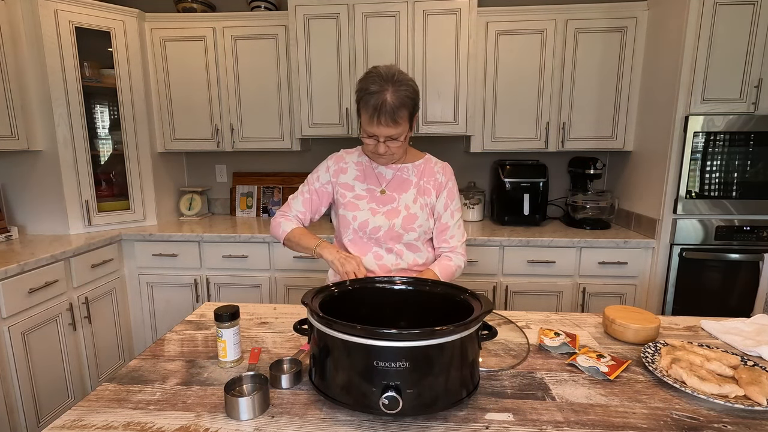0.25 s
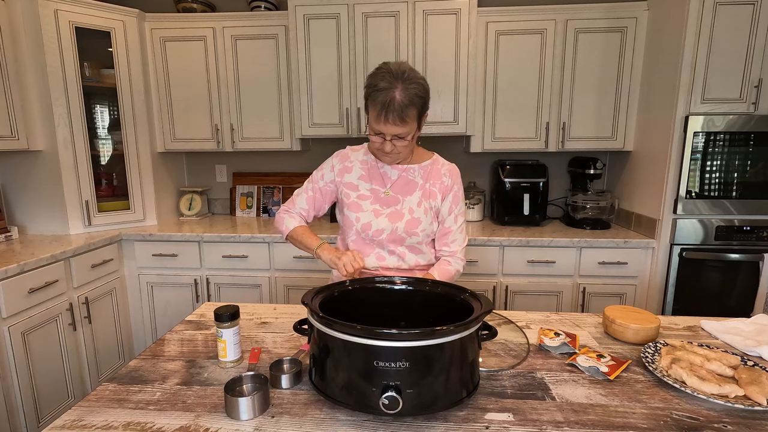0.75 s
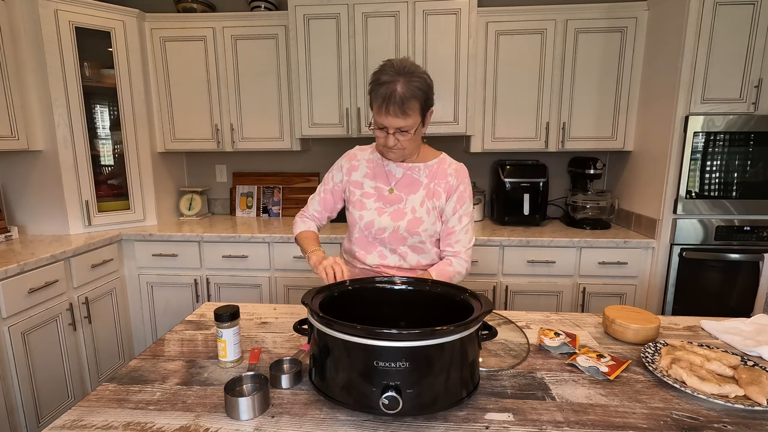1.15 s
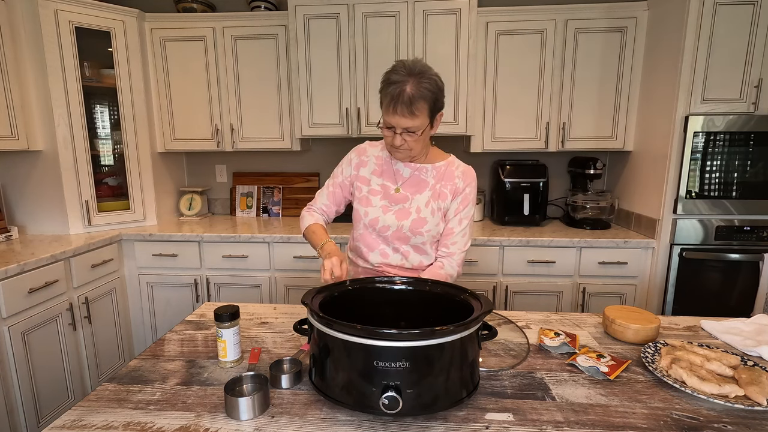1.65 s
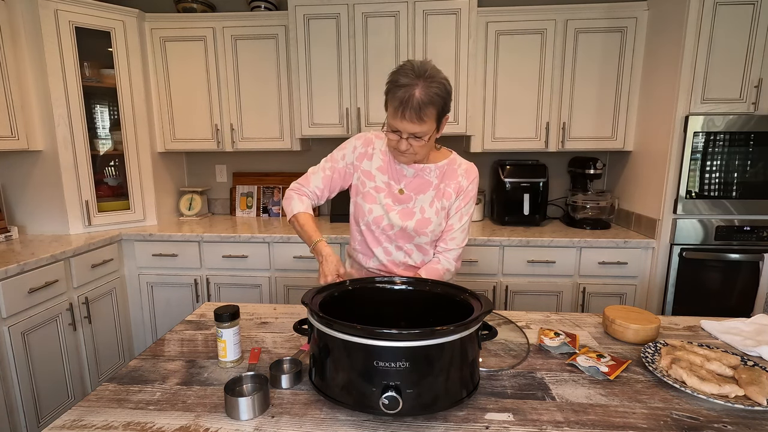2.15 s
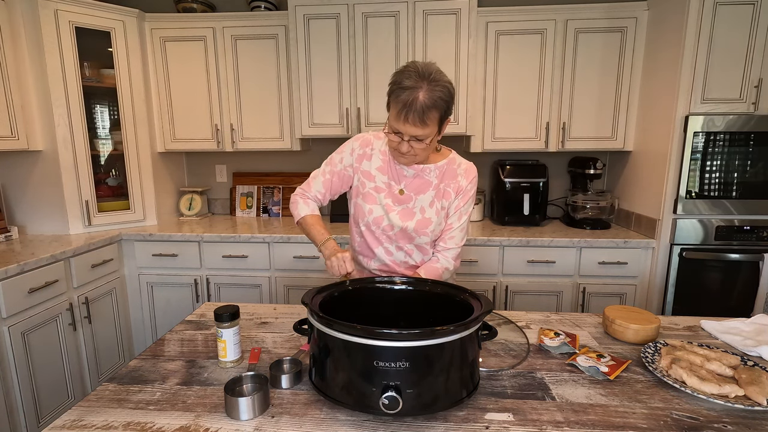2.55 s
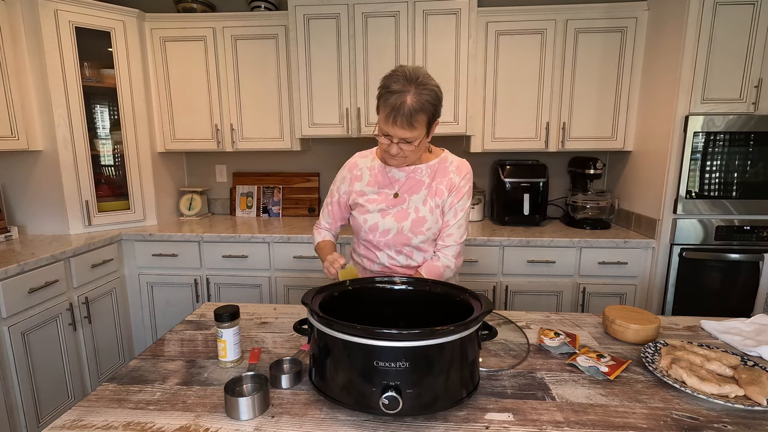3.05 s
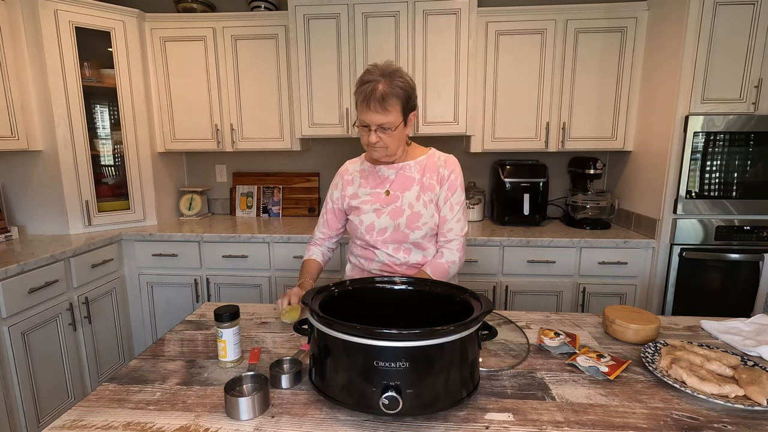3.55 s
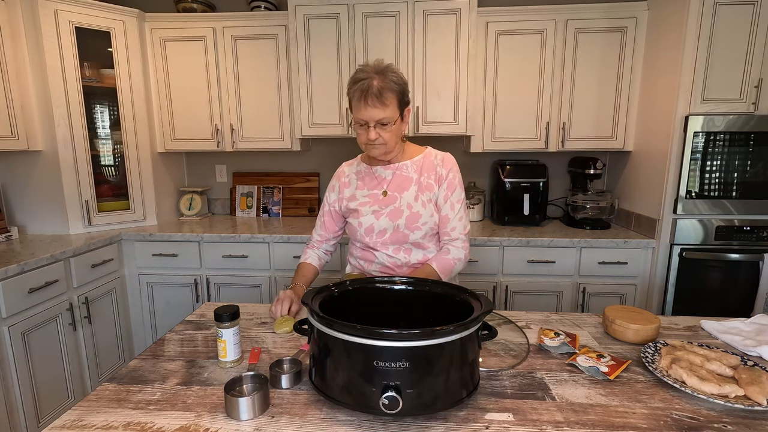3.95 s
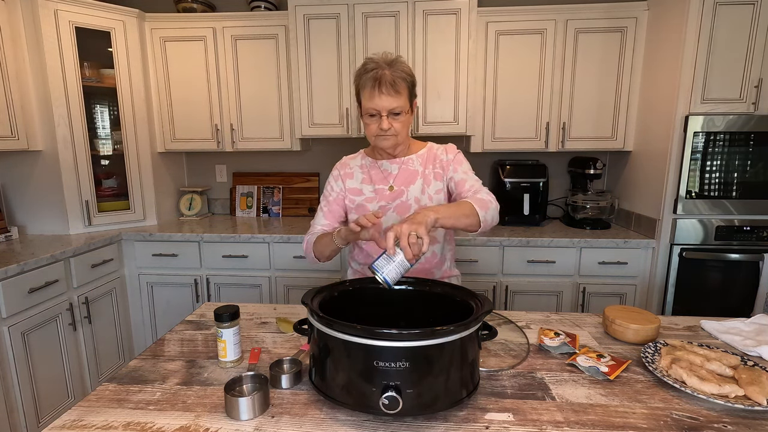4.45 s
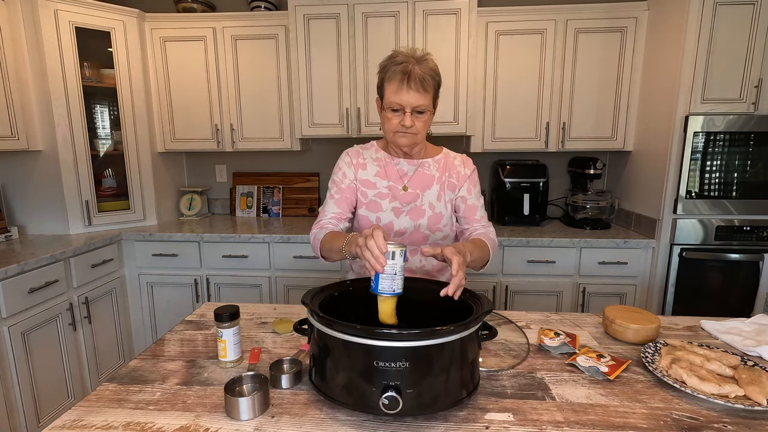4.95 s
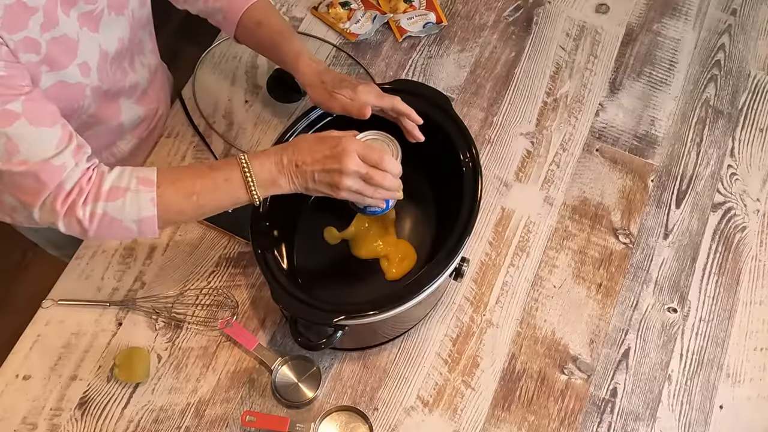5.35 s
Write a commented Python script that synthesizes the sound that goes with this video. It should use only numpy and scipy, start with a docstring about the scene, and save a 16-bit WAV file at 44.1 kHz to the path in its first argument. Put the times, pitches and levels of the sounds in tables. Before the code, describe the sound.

Light can scuffs lead to a crisp tab click, then straining low metal groans and a hollow pop. A second loud tear peels the lid, followed by small crackly scrapes and a final snap. The thin lid taps and slides on a counter, sleeves rustle faintly, then a ceramic clink and soft wet plops. Stereo room pickup with a short kitchen tail, quiet rumble and hiss.

```python
"""In a kitchen, a ring-pull soup can is opened: the tab snaps up, the seam pops, the lid tears back and breaks free.
The lid is laid on the counter, the can clinks on a stoneware pot and thick soup flops in.
Contacts are noise bursts shaped by each body, some with ringing tones; tearing and sliding are runs of tiny slips.
Hard cabinets answer with a short tail. Under it lie a low room rumble, a thin hiss and faint falling
whistles, like a bird outside, made from gliding sine tones."""
import sys
import numpy as np
from scipy import signal
from scipy.fft import rfft, irfft, next_fast_len
from scipy.io import wavfile
from scipy.ndimage import map_coordinates

SR = 44100
rng = np.random.default_rng(int(sys.argv[2]) if len(sys.argv) > 2 else 0)


def log_audio(samples):
    """Write samples as a 16-bit WAV file to the path given in sys.argv[1]."""
    # one column per channel
    frames = np.atleast_2d(samples).T
    # limit to full scale, then quantise
    limited = np.clip(frames, -1, 1)
    pcm = np.round(limited * 32767).astype(np.int16)
    wavfile.write(sys.argv[1], SR, pcm)


N = 247356  # length of the scene in samples

# Contacts. Columns: (time [s], level [dB], brightness [dB], contact length [s])
# snaps and ticks of the tin
SNAPS = [(0.4188, -70, -1, 0.0096), (0.714, -64, -10.5, 0.027), (0.8017, -42, 1.5, 0.023),
         (0.8046, -46.5, -0.5, 0.0017), (0.8418, -55, -2, 0.02), (1.3015, -55, -12.5, .016),
         (1.5978, -67.5, -4, 0.03), (1.832, -77, -7, .03), (2.1725, -95.5, 12, 0.0055),
         (2.7804, -76.5, -13, 0.022), (2.812, -62, -4, 0.024), (3.2156, -46, 7.5, 0.017),
         (3.3963, -70.5, 8, 0.06), (4.648, -81.5, 16, 0.029), (5.1107, -70, 10.5, 0.052),
         (5.547, -83, 19, .042)]
# the seam gives way and the lid buckles; columns as above
POPS = [(1.3231, -34.5, 1.5, 0.077), (1.3485, -45.5, -3.5, .04), (1.3626, -41, 4, .068),
        (2.4005, -56, -6.5, 0.075), (3.2185, -55, -1.5, 0.031)]
# a dull knock as the grip changes; columns as above
KNOCKS = [(1.879, -78, -1, 0.08)]
# the loose lid touches the counter; columns as above
LID_TAPS = [(3.7264, -72, -4.5, 0.004), (3.7379, -46.5, 0, 0.029), (4.0776, -67, -7, .007),
            (4.1106, -51, 2, 0.046)]
# the can touches the pot; columns as above
POT_TAPS = [(5.1566, -52, -0.5, 0.16), (5.5997, -61, -3.5, 0.029)]
# soup lands; columns as above
FLOPS = [(5.166, -64, -3.5, 0.18), (5.1884, -52, -3, 0.035), (5.2389, -46.5, -1, 0.08),
         (5.2511, -55, 0, 0.18), (5.3118, -53, 0.5, 0.15), (5.3755, -61, -3.5, 0.077)]

# Rubbing strokes. Columns: (peak time [s], rise [s], fall [s], level [dB], brightness [dB])
# the can scuffs on the counter
SCUFFS = [(.02, .02, 0.054, -62, -3.5), (.425, 0.0083, 0.074, -54.5, 6.5), (.54, 0.055, 0.16, -66.5, 3),
          (.73, .018, 0.039, -50, -3)]
# strokes that pry the tab and tear the seam; columns as above
TEARS = [(.44, .02, 0.15, -70, 7), (.54, .07, .18, -63.5, -11.5), (.725, .015, 0.076, -51, -5.5),
         (1.1, 0.097, 0.11, -41, -3), (1.312, .055, 0.004, -39.5, -11), (1.375, .02, 0.069, -41.5, -8),
         (2.399, .012, 0.053, -35, 3.5), (2.428, .025, 0.023, -33.5, 1), (2.595, .025, 0.058, -50.5, -1.5),
         (2.705, .04, 0.033, -54, -1), (2.818, .014, 0.062, -52, 3), (2.985, .02, 0.08, -55, 2.5),
         (3.07, .07, 0.05, -48, 4.5), (3.205, .045, 0.0033, -42, 2.5), (3.405, .04, 0.045, -54, -7)]
# the lid slides on the counter; columns as above
SLIDES = [(3.905, .04, 0.052, -51, 3), (4.04, 0.04, 0.065, -55, -1), (4.098, .03, .012, -48.5, 0)]

# Other strokes. Columns: (peak time [s], rise [s], fall [s], level [dB])
# the can wall groans under the pull
GROANS = [(.5, .03, 0.11, -45), (0.551, .02, 0.032, -40.5), (0.634, .015, 0.21, -48),
          (0.734, .02, 0.055, -45), (1.073, .015, 0.037, -38.5), (1.146, .016, 0.035, -31),
          (1.218, .03, 0.048, -27), (1.305, .05, 0.045, -28), (2.411, .016, 0.043, -26.5),
          (2.829, .02, 0.062, -45), (2.938, .05, 0.14, -52.5), (3.223, .008, 0.055, -25)]
# fingers and sleeves brush over the tin; columns as above
BRUSHES = [(0.659, 0.092, .12, -67.5), (0.771, .035, 0.031, -54.5), (1.9, 0.059, 0.036, -68.5),
           (4.537, .09, 0.138, -67), (4.678, 0.065, 0.098, -64.5), (4.784, 0.055, 0.044, -63),
           (4.896, .05, 0.067, -61.5)]
# pulls that curl the lid; columns as above
CURLS = [(2.445, .02, 0.043, -35), (2.51, 0.028, 0.12, -50), (2.6, .03, 0.081, -47.5),
         (2.69, .03, 0.059, -49.5)]

# one falling whistle: (time after its start [s], pitch [Hz], level before its start level is added [dB])
WHISTLE_GLIDE = [(0, 6170, -13), (.06, 5270, 3), (0.159, 4920, -12.5), (.23, 4610, -6), (.31, 3544, 1.5),
                 (.385, 3435, 1.5), (0.442, 3040, -7), (.519, 2950, -4.5)]
# when that whistle is heard: (start time [s], level to add [dB])
WHISTLE_STARTS = [(0.045, -67.5), (4.584, -64.5)]
# a separate falling chirp: (time [s], pitch [Hz], level before a common cut [dB])
CHIRP_GLIDE = [(4.222, 4660, -69), (4.34, 4650, -67), (4.359, 4470, -62), (4.379, 4150, -58.5),
               (4.4, 3700, -77)]

# resonances of the can: (pitch [Hz], width before the grip widens it [Hz], strength, halved in use [dB])
CAN_RESONANCES = [(288, 12, -6.5), (832, 6.4, -11), (1352, 58, -16.5), (1657, 28, 5.5), (1954, 46, -1.5),
                  (2400, 54, -31.5), (2700, 9.7, -18), (2790, 130, -28.5)]
# ringing tones of the lid: (pitch [Hz], level [dB], time to drop 60 dB before the extra fade [s])
LID_MODES = [(2090, 5, .2), (2685, 9, .22), (3090, 3, 0.23), (3470, -0.5, 0.33), (3610, 9.5, 0.28),
             (3700, 1.5, 0.4), (4100, -5, 0.21), (4700, -10.5, .35), (6600, -0.5, 0.16), (8200, -24, 0.16)]
# ringing tones of the pot; columns as above
POT_MODES = [(1260, -9, 0.94), (3130, -2, 0.13), (4570, -1.5, 0.087), (5326, 6, 0.0906), (5905, 0, 0.21),
             (5950, 2.5, 0.14), (6261, 6.5, 0.074), (8086, -66, 0.75), (8716, -18.5, 0.177),
             (9460, -2, 0.19), (9800, -10.5, 0.25)]

# Colours: how strongly each body or noise sounds at each frequency. Columns: (frequency [Hz], level [dB])
# the can when it snaps
CAN_COLOUR = [(35, -46.5), (60, -21), (186, -19.5), (263, -8.5), (418, -16.5), (551, -25), (744, -16),
              (1010, -15.5), (1670, -13), (2470, -29.5), (4110, -24), (9670, -34.5), (15000, -59)]
# the can when it pops; columns as above
POP_COLOUR = [(24, -20.5), (40, 2), (76, 5), (109, 7.5), (234, -21.5), (264, -0.5), (321, -6.5), (464, 2),
              (538, -13), (796, -5.5), (945, -9.5), (1180, -6), (3140, -35.5), (5940, -40.5), (14000, -66)]
# the torn tin; columns as above
TEAR_COLOUR = [(71, -51), (120, -20.5), (173, 0), (280, -4.5), (323, -6.5), (465, -15), (616, -28.5),
               (696, -13), (1200, -8), (2860, -28.5), (4940, -29.5), (9430, -42.5), (15000, -71.5)]
# the scuffing can; columns as above
SCUFF_COLOUR = [(60, -26), (175, 4), (300, 2.5), (550, -20), (900, -5), (1350, -7.5), (2500, -27),
                (9000, -48.5)]
# the dull knock; columns as above
KNOCK_COLOUR = [(47, -45), (80, 7), (181, -2.5), (343, -13), (476, -4.5), (570, -19), (680, -2),
                (780, -9.5), (932, -31), (1270, -31), (4000, -33), (5200, -68), (8800, -120)]
# skin and cloth; columns as above
BRUSH_COLOUR = [(600, -23.5), (1500, -12.5), (2600, 1.5), (4000, 7), (7500, 11.5), (12500, 0), (15000, -17)]
# the lid; columns as above
LID_COLOUR = [(35, -73.5), (60, -18), (289, -1), (324, -7.5), (355, -1), (648, -18.5), (780, -14.5),
              (1360, -5), (1830, -7), (2110, -1), (3580, -3.5), (8620, -17), (9670, -20.5), (15000, -44)]
# the pot; columns as above
POT_COLOUR = [(59, -104), (100, 13), (1020, -51.5), (1260, 14), (1530, -14.5), (2420, -3.5), (2580, -41),
              (3050, 1), (3530, -7), (6090, -1.5), (10500, -10.5), (14100, -24), (15000, -72.5)]
# the soup; columns as above
SOUP_COLOUR = [(15, -52.5), (25, -1), (65, -19.5), (164, -16.5), (238, -10.5), (266, 8), (295, -11),
               (372, -4.5), (472, -23.5), (584, -15.5), (1470, -27.5), (2380, -28), (5690, -36.5),
               (14000, -70.5)]
# the room rumble; columns as above
RUMBLE_COLOUR = [(12, -37), (20, 8.5), (45, -3.5), (97, -16), (164, -13.5), (278, -21.5), (470, -29),
                 (1020, -33), (1240, -27), (3360, -41.5), (5090, -57.5), (6910, -36.5), (8860, -57.5),
                 (10500, -57.5), (15000, -73)]
# the hiss; columns as above
HISS_COLOUR = [(2500, -23), (5000, -8.5), (7500, -11), (9100, -7), (9700, -18), (15000, -32)]

# how long the kitchen's answer lasts: (frequency [Hz], time to drop 60 dB [s])
KITCHEN_DECAY = [(100, 0.71), (300, 0.4), (1000, 0.44), (3000, 0.42), (7000, 0.36), (14000, 0.3)]
# how strong the answer is: (frequency [Hz], level before each sound's wet level is added [dB])
KITCHEN_GAIN = [(80, -7), (250, -0.5), (1200, 3.5), (3000, -3), (7000, -5), (14000, -7.5)]
# how alike left and right are: (frequency [Hz], likeness [0 to 1])
ALIKE = [(100, 0.91), (300, 0.95), (700, 0.71), (2500, 0.45), (7000, .68), (13000, 0.15)]
# borders of the four registers thud, wall, clank and crack: [Hz]
EDGES_HZ = [20, 170, 550, 2300, 16000]

# Shares of the registers before brightness. Columns: (thud [dB], wall [dB], clank [dB], crack [dB])
# snaps
SNAP_SHARE_DB = [-8, -2, -2.5, -3]
# pops; columns as above
POP_SHARE_DB = [-4, -3, -1.5, -11]
# the knock; columns as above
KNOCK_SHARE_DB = [-11, 16, -12, -5.5]
# lid taps; columns as above
LID_SHARE_DB = [-30, -8.5, -1, 6]
# pot taps; columns as above
POT_SHARE_DB = [-10, -17, -4, 9]
# soup; columns as above
SOUP_SHARE_DB = [4, 6.5, -0.5, -5.5]
# tears; columns as above
TEAR_SHARE_DB = [-11.5, -1.5, -2.5, -4]
# lid slides; columns as above
SLIDE_SHARE_DB = [-40, -8, 2.5, 0.5]
# scuffs; columns as above
SCUFF_SHARE_DB = [-5.5, 4, -2, -42]

TOP_HZ = 15400  # nothing is kept from here up
GROAN_HZ = 271
GRIP_HZ = 45  # the gripping hand widens each can resonance by this much
SWELL_DB = 12.5  # a stroke starts and ends this far under its peak
SHEEN_HZ, SHEEN_TILT = 4000, 0.6  # well above this, each dB of brightness adds so many dB per octave
# the curling lid's note climbs steadily as it peels; the width is how far it reaches to each side
CURL_HZ, CURL_RISE_HZ_PER_S, CURL_START_S, CURL_WIDTH_HZ = 787, 4500, 2.39, 394


def amp(db):
    """Turn decibels into gain."""
    return 10 ** (np.asarray(db) / 20)


def unit(x):
    """Scale a sound to an average (rms) strength of 1."""
    return x / np.sqrt(np.mean(x ** 2) + 1e-30)


def along(points, hz):
    """Read a (frequency, value) table at any frequency, on a log axis."""
    f, v = np.transpose(points)
    return np.interp(np.log(hz + 1), np.log(f + 1), v)


def curves(rows):
    """Give a 5 ms fade at both ends, then each column joined up sample by sample over the rows' time span."""
    times, *columns = np.transpose(rows)
    t = np.arange(times[0], times[-1] + .01, 1 / SR)
    fade = np.clip(np.minimum(t - t[0], t[-1] - t) / .005, 0, 1)
    return [fade] + [np.interp(t, times, column) for column in columns]


def swell(rise, fall):
    """Gain of one stroke: it climbs to its peak and dies away, evenly in dB."""
    times = np.cumsum([0, max(rise, .003), max(fall, .003)])
    fade, db = curves(np.transpose([times, [-SWELL_DB, 0, -SWELL_DB]]))
    return fade * amp(db)


def wobble(rate, size):
    """A smooth random curve with this many random points a second."""
    knots = rng.standard_normal(int(size * rate / SR) + 4)
    return map_coordinates(knots, [np.arange(size) * rate / SR])


def add(track, s, sound):
    """Mix a sound into the track from time s."""
    part = track[:, max(round(s * SR), 0):][:, :sound.shape[-1]]
    part += sound[..., :part.shape[-1]]


def filtered(x, response):
    """Shape a sound by a gain (and phase) that depends on frequency."""
    size = 2 * next_fast_len(x.shape[-1] // 2 + 4096)
    hz = np.fft.rfftfreq(size, 1 / SR)
    return irfft(rfft(x, size) * response(hz), size)[..., :x.shape[-1]]


def causal(points, hz):
    """A filter with the given colour that reacts as early as it can (minimum phase)."""
    cepstrum = irfft(np.log(amp(np.maximum(along(points, hz), -80))))
    half = len(hz) - 1
    folded = np.r_[cepstrum[0], 2 * cepstrum[1:half], np.zeros(half)]
    return np.exp(rfft(folded))


def tin(colour, hz, ring_db):
    """A colour with the can's resonances standing out of it; the gripping hand widens them."""
    peaks = 0
    for centre, width, db in CAN_RESONANCES:
        peaks = peaks + amp(db / 2) * 1j * hz * width / (centre ** 2 - hz ** 2 + 1j * hz * (width + GRIP_HZ))
    return causal(colour, hz) * (1 + amp(ring_db) * peaks)


def registers(x):
    """Split a sound into thud, wall, clank and crack parts, each of rms 1."""
    parts = []
    for edges in zip(EDGES_HZ, EDGES_HZ[1:]):
        band = signal.butter(3, edges, 'band', fs=SR, output='sos')
        parts.append(unit(signal.sosfilt(band, x)))
    return parts


def voiced(x, share_db, bright_db):
    """Weigh the registers of a sound; a brighter contact gains crack and sheen and loses bass."""
    x = filtered(x, lambda hz: amp(bright_db * SHEEN_TILT * np.log2(np.hypot(1, hz / SHEEN_HZ))))
    weights = amp(np.add(share_db, bright_db * np.array([-1, -1, 0, 1])))
    return weights @ np.array(registers(x))


def spread(pair):
    """Mix two unrelated noises so that left and right are as alike as the table says."""
    turn = lambda hz: np.arccos(np.clip(along(ALIKE, hz), 0, 1)) / 2
    mid, side = filtered(pair, lambda hz: np.array([np.cos(turn(hz)), np.sin(turn(hz))]))
    return np.array([mid + side, mid - side])


def kitchen(x, wet_db):
    """Direct sound plus a diffuse tail as the cabinets answer; left is a little louder above the bass."""
    hz, t, noise = signal.stft(spread(rng.standard_normal((2, SR * 2 // 3))), SR, nperseg=256)
    decay = amp(along(KITCHEN_GAIN, hz)[:, None] - 60 * t / along(KITCHEN_DECAY, hz)[:, None])
    tail = signal.istft(noise * decay, SR, nperseg=256)[1]
    tail = tail * np.sqrt(2 * np.log(1000) / (.5 * SR))
    build_up = np.clip(np.arange(tail.shape[1]) / (0.0029 * SR), 0, 1) ** 2  # over 2.9 ms
    answer = amp(wet_db) * tail * build_up
    answer[:, 0] += 1  # the direct sound
    lean = lambda hz: amp(np.outer([.5, -.5], along([(200, -0.5), (500, 2.0)], hz)))
    return filtered(signal.fftconvolve(x[None], answer, axes=1), lean)


def ringing(modes, t):
    """A sum of dying sine tones with slightly unsteady pitch, faded out within a third of a second."""
    ring = 0
    for hz, db, t60 in modes:
        phase = 2 * np.pi * hz * t + 1.2 * wobble(150, len(t))
        ring = ring + amp(db + rng.normal(0, 1.2) - 60 * t / t60) * np.sin(phase)
    return unit(ring * (1 - t / t[-1]))


def blows(rows, body, share_db, grit, wet_db, soft=0, modes=(), ring_db=0):
    """Each contact is a push and a short chatter into the body, which may ring on in its modes."""
    out, t = np.zeros((2, N)), np.arange(SR // 3) / SR
    for s, level_db, bright_db, length in rows:
        force = rng.standard_normal(len(t)) * amp(-60 * t / max(length, .001))
        force *= grit * np.sqrt(length / 0.016) / np.linalg.norm(force)  # longer contacts chatter more
        force[0] += 1  # the push
        if soft:
            force *= 1 - np.exp(-t / soft)  # a yielding contact swells over some milliseconds
        sound = voiced(filtered(force, body), share_db, bright_db)
        if len(modes):
            sound = sound + amp(bright_db + ring_db) * ringing(modes, t)
        add(out, s, kitchen(amp(level_db) * sound, wet_db))
    return out


def slips(size, rate, scatter_db, smooth):
    """Stick and slip: tiny releases of uneven size (rate a second on average) over a smooth rub."""
    sizes = amp(scatter_db * np.clip(rng.standard_normal(size), -2, 2))
    grains = (rng.random(size) < rate / SR) * sizes * rng.choice([-1, 1], size)
    return unit(grains) + smooth * rng.standard_normal(size)


def strokes(rows, body, share_db, rate, scatter_db, smooth, wet_db):
    """Runs of slips shake the body as hard as each stroke pulls."""
    out = np.zeros((2, N))
    for peak, rise, fall, level_db, bright_db in rows:
        pull = amp(level_db) * swell(rise, fall)
        rub = filtered(slips(len(pull), rate, scatter_db, smooth), body)
        add(out, peak - rise, kitchen(pull * voiced(rub, share_db, bright_db), wet_db))
    return out


def room_tone():
    """A slowly heaving rumble and a thin steady hiss, both coloured noise."""
    def noise(colour):
        pair = spread(rng.standard_normal((2, N)))
        return unit(filtered(pair, lambda hz: amp(along(colour, hz))))
    rumble = amp(-57.5 + 1.7 * wobble(6.26, N)) * noise(RUMBLE_COLOUR)
    return rumble + amp(-78.5) * noise(HISS_COLOUR)


def scuffs():
    """The can rubs on the counter in uneven little slips."""
    return strokes(SCUFFS, lambda hz: causal(SCUFF_COLOUR, hz), SCUFF_SHARE_DB,
                   rate=370, scatter_db=2.5, smooth=0.4, wet_db=1)


def whistles():
    """Thin falling sine tones with a slightly shaky pitch, smeared by distance with a strong tail."""
    out = np.zeros((2, N))
    calls = [(s, db, WHISTLE_GLIDE) for s, db in WHISTLE_STARTS] + [(CHIRP_GLIDE[0][0], 0, CHIRP_GLIDE)]
    for s, level_db, rows in calls:
        fade, hz, db = curves(rows)
        shaky_hz = hz * (1 + 0.0019 * wobble(160, len(hz)))
        tone = np.sin(2 * np.pi * np.cumsum(shaky_hz) / SR)
        add(out, s, kitchen(fade * amp(db + level_db - 7.0) * tone, wet_db=11.5))
    return out


def snaps():
    """Sudden small releases of the tin set off the can's resonances."""
    return blows(SNAPS, lambda hz: tin(CAN_COLOUR, hz, ring_db=4.5), SNAP_SHARE_DB, grit=1.8, wet_db=5.0)


def tears():
    """Prying and tearing shake the can in a run of slips."""
    return strokes(TEARS, lambda hz: tin(TEAR_COLOUR, hz, ring_db=2.5), TEAR_SHARE_DB,
                   rate=490, scatter_db=-3.5, smooth=0.75, wet_db=2.5)


def groans():
    """At each pull the can wall groans on one low note with unsteady phase and level."""
    out = np.zeros((2, N))
    for peak, rise, fall, level_db in GROANS:
        pull = swell(rise, fall)
        phase = 2 * np.pi * GROAN_HZ * np.arange(len(pull)) / SR + .5 * wobble(60, len(pull))
        level = pull * amp(level_db + 1.5 * wobble(34, len(pull)))
        add(out, peak - rise, kitchen(level * unit(np.sin(phase)), wet_db=-10.0))
    return out


def brushing():
    """Skin and cloth make a fine, airy rustle."""
    out = np.zeros((2, N))
    for peak, rise, fall, level_db in BRUSHES:
        touch = amp(level_db) * swell(rise, fall)
        rub = slips(len(touch), rate=500, scatter_db=2, smooth=.5)
        rustle = filtered(rub, lambda hz: causal(BRUSH_COLOUR, hz))
        add(out, peak - rise, kitchen(touch * unit(rustle), wet_db=6.5))
    return out


def pops():
    """The seam gives way and the lid buckles, setting off the can's resonances strongly."""
    return blows(POPS, lambda hz: tin(POP_COLOUR, hz, ring_db=13.5), POP_SHARE_DB, grit=0.6, wet_db=4.5)


def knock():
    """A dull knock as the grip changes, without ringing tones."""
    return blows(KNOCKS, lambda hz: causal(KNOCK_COLOUR, hz), KNOCK_SHARE_DB, grit=0.63, wet_db=4.5)


def curling():
    """At each pull the lid scrapes with a rough note that climbs as the curl tightens."""
    out = np.zeros((2, N))
    for peak, rise, fall, level_db in CURLS:
        pull = swell(rise, fall)
        t = peak - rise - CURL_START_S + np.arange(len(pull)) / SR
        turn = np.exp(2j * np.pi * np.cumsum(CURL_HZ + CURL_RISE_HZ_PER_S * t) / SR)
        kicks = slips(len(t), rate=260, scatter_db=-1.5, smooth=0.47)
        # shift the moving note down to 0 Hz, keep what lies near it, then shift it back up
        near = signal.butter(2, CURL_WIDTH_HZ, fs=SR, output='sos')
        note = turn * signal.sosfilt(near, kicks / turn)
        level = pull * amp(level_db + 2.0 * wobble(45, len(t)))
        add(out, peak - rise, kitchen(level * unit(note.real), wet_db=0.0))
    return out


def lid_taps():
    """The loose lid touches the counter and rings briefly."""
    return blows(LID_TAPS, lambda hz: causal(LID_COLOUR, hz), LID_SHARE_DB,
                 grit=0.5, wet_db=5.0, modes=LID_MODES, ring_db=-3)


def lid_slides():
    """The lid slides on the counter in dense little slips."""
    return strokes(SLIDES, lambda hz: causal(LID_COLOUR, hz), SLIDE_SHARE_DB,
                   rate=650, scatter_db=-0.5, smooth=0.79, wet_db=1)


def pot_taps():
    """The can chatters on the stoneware pot, which rings clearly."""
    return blows(POT_TAPS, lambda hz: causal(POT_COLOUR, hz), POT_SHARE_DB,
                 grit=4.8, wet_db=3, modes=POT_MODES, ring_db=9)


def soup_flops():
    """Thick soup lands softly: it yields, so each contact swells in."""
    return blows(FLOPS, lambda hz: causal(SOUP_COLOUR, hz), SOUP_SHARE_DB, grit=2.3, wet_db=1.0, soft=0.0025)


def scene():
    """Open the can, put the lid down, tip out the soup."""
    background = room_tone() + whistles()
    can = scuffs() + snaps() + tears() + groans() + brushing() + pops() + knock() + curling()
    lid = lid_taps() + lid_slides()
    return background + can + lid + pot_taps() + soup_flops()


def record(dry):
    """Keep only what lies below the top frequency."""
    return filtered(dry, lambda hz: hz < TOP_HZ)


dry = scene()
out = record(dry)
log_audio(out)
```